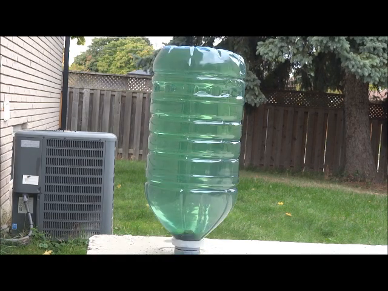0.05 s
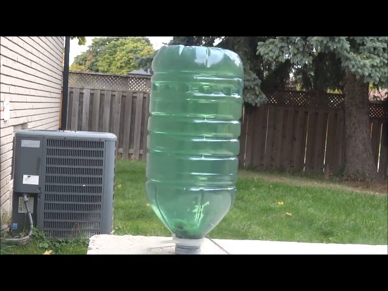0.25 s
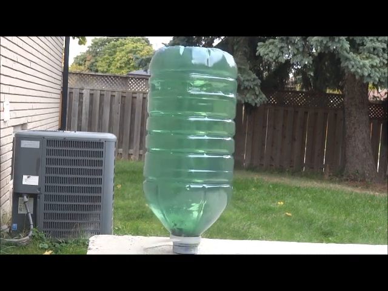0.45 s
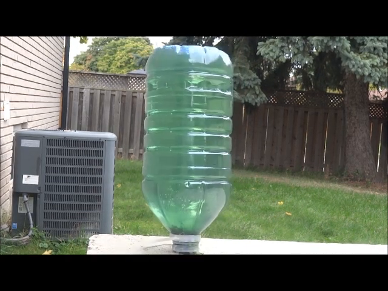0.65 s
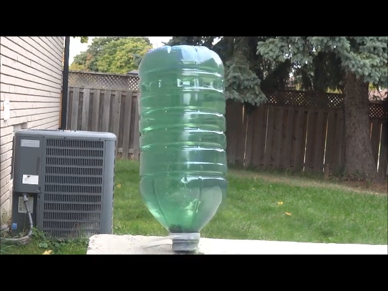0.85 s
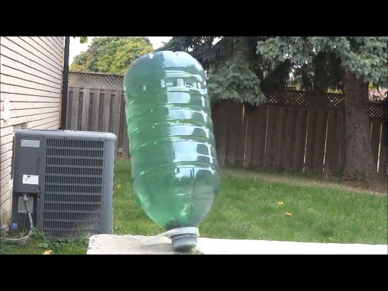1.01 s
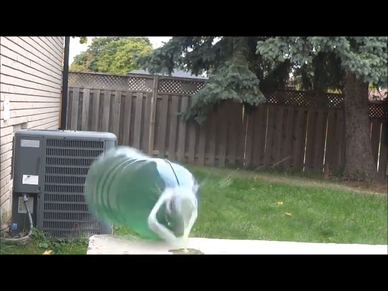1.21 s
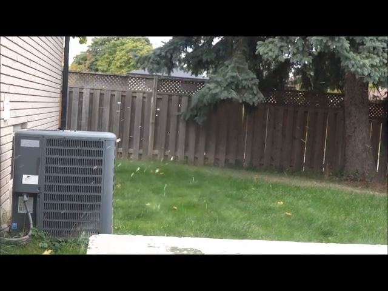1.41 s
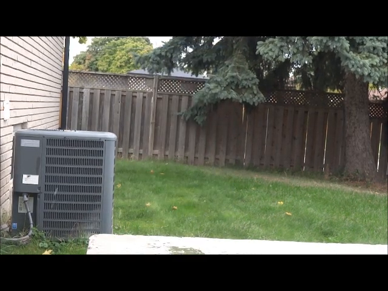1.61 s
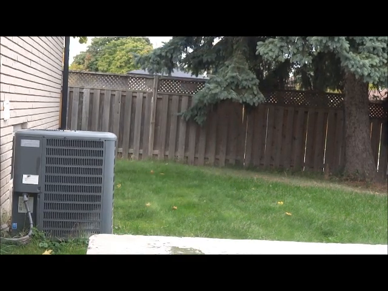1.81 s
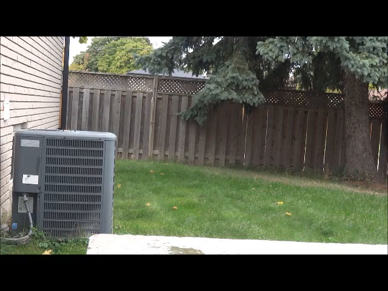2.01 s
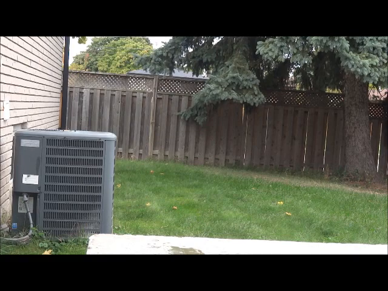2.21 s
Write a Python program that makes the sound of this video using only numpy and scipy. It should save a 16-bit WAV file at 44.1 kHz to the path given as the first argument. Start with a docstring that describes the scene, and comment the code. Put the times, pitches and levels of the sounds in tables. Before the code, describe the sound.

A big plastic bottle topples in a backyard. First a thin steel piece strikes beneath it, booming the board and clinking to rest. The bottle then crackles, thuds hollowly to the ground and bounces, close to the microphone.

```python
"""A distant rush fills a fenced yard, turned down by the recorder after the loud strikes and slowly
coming back. A thin steel piece strikes under a big plastic bottle standing on its cap on a board: the
board booms, and the steel bounces to rest, ringing at each clink. The bottle tips, crackles over the
edge as its wall buckles, thuds to the ground and bounces, its hollow inside ringing. The yard adds a
thin echo, and the close microphone's limiter turns the sound down under the loudest blows."""
import sys
import numpy as np
from scipy import signal
from scipy.fft import rfft, irfft
from scipy.io import wavfile
from scipy.ndimage import uniform_filter1d, minimum_filter1d

SR = 44100
rng = np.random.default_rng(int(sys.argv[2]) if len(sys.argv) > 2 else 0)


def master(y):
    """Save y as 16-bit WAV."""
    cut = np.clip(np.atleast_2d(y).T, -1, 1)
    pcm = np.round(cut * 32767)  # scale
    wavfile.write(sys.argv[1], SR, pcm.astype(np.int16))


N = 103635
TIME = np.arange(N) / SR
FREQS = np.maximum(np.arange(N // 2 + 1) * SR / N, 1)


def amp(db):
    """Turn decibels into a factor to multiply by."""
    return 10 ** (np.asarray(db) / 20)


def curve(points):
    """Join (frequency [Hz], level [dB]) points into a gain for every frequency."""
    hz, db = np.array(points, float).T
    return amp(np.interp(np.log(FREQS), np.log(hz), db))


def noise(gain, flutter=1):
    """Stereo noise of level 1, coloured by gain; the bass is nearly the same in both ears."""
    mid, side = rfft(rng.standard_normal((2, N)) * flutter) * gain
    side *= 0.0023 + 0.27 * FREQS ** 2 / (FREQS ** 2 + 870 ** 2)  # widens around 870 Hz
    stereo = irfft(np.array([mid + side, mid - side]), N)
    return stereo / stereo.std()


def envelope(start, rise, hold, t60):
    """Rise, hold, then fade. The fade time, t60, is the seconds it takes to drop 60 dB."""
    t = TIME - start
    return np.clip(t / rise, 0, 1) * np.exp(-np.log(1000) * np.clip((t - rise - hold) / t60, 0, 10))


def ring(start, hz, t60, rise, hold=0, side=0):
    """One fading tone of a struck object; side makes left and right differ."""
    first = int(start * SR)
    t = TIME[:min(N - first, int((rise + hold + t60 * 2) * SR))]
    level = envelope(0, rise, hold, t60)[:len(t)]
    mid, diff = (np.sin(2 * np.pi * hz * t + phase) for phase in rng.uniform(0, 2 * np.pi, 2))
    out = np.zeros((2, N))
    out[:, first:first + len(t)] = level * np.array([mid + side * diff, mid - side * diff])
    return out


def pan(sound, left_db):
    """Lean a sound to the left, or to the right if left_db is negative."""
    return sound * amp([[left_db / 2], [-left_db / 2]])


def crinkle(steps_per_s=503, depth_db=1.5):
    """The fast, random flutter in loudness of a buckling wall."""
    gain = amp(depth_db * np.interp(TIME * steps_per_s, np.arange(N), rng.standard_normal(N)))
    return gain / np.sqrt(np.mean(gain ** 2))


def crinkle_bands(colour):
    """Crinkling noise split into octaves, as (centre [Hz], sound) pairs."""
    spectrum = rfft(noise(curve(colour), crinkle()))
    octave = np.log2(FREQS / 1000)
    return [(1000 * 2. ** k, irfft(spectrum * np.maximum(1 - abs(octave - k), 0), N))
            for k in range(-5, 5)]


def burst(bands, start, rise, hold, t60, tilt_db=0, treble_damping=0.21):
    """A blow wakes so many tones that they blur into noise; the high ones die sooner."""
    out = np.zeros((2, N))
    for hz, band in bands:
        gain = amp(tilt_db * np.log2(hz / 1000))
        fade_s = t60 * (hz / 1000) ** -treble_damping
        out += gain * band * envelope(start, rise, hold, fade_s)
    return out


# tone colour of the rush (frequency [Hz], level [dB])
RUSH_COLOUR = [(25, -49), (60, -23), (115, -6), (200, -8), (400, -3), (950, 2), (2200, -10), (3800, -22),
               (7000, -26), (11000, -28), (15500, -38)]
# the rush's level as the recorder turns it down and back up (time [s], level [dB])
RUSH_LEVELS = [(0, -33), (.22, -31.5), (.7, -40), (1.2, -40.5), (1.65, -38.5), (2.35, -37.5)]


def distant_rush():
    """A distant rush, turned down by the recorder after the loud strikes and slowly coming back."""
    times, levels_db = np.array(RUSH_LEVELS).T
    return noise(curve(RUSH_COLOUR)) * amp(np.interp(TIME, times, levels_db))


# families of steel tones: five bend the flat face, "edge" bends it edgewise
FAMILIES = ["low", "middle", "bright", "high", "top", "edge"]
# how long each family of steel tones rings, as a factor on its fade time
FADE_FACTOR = dict(low=1, middle=0.6, bright=0.69, high=0.53, top=0.66, edge=0.78)
# the steel's own tones (pitch [Hz], level [dB], fade time before FADE_FACTOR [s], family)
STEEL_TONES = [(771, -3.5, .3, "low"), (1361, 1, .21, "low"), (1835, -4, .6, "low"),
               (3130, 4, .13, "middle"), (4320, -.5, .28, "middle"), (4850, -1.5, .28, "middle"),
               (5636, -3, .14, "bright"), (8790, -4, .13, "bright"), (2212, -7, .2, "high"),
               (7122, -2, .17, "high"), (7162, 1, .14, "high"), (7425, -9, .2, "high"),
               (10285, -2, .16, "top"), (10540, -1.5, .15, "top"), (12190, -5, .11, "top"),
               (14485, -3, .09, "top"), (1719, 0, .6, "edge"), (2885, 0, .33, "edge"),
               (5068, -1, .22, "edge"), (10002, 1, .2, "edge")]
# each time the steel hits (time [s], one level for each of the six families [dB], tick level [dB])
STEEL_HITS = [(0.2343, -26, -27.5, -2, -8, -8, -26, -1), (.2555, -39, -16, -16, -8, -25, -16, -2),
              (.275, -26, -25, -3.5, -13.5, -8, -39, -16), (0.3356, -25, -34, -4, 7, -1, -37, -4),
              (.3542, -18, -5, 5, -7, -3.5, -35, 8), (.3805, -37, -26, 2, 0.5, -6.5, -11, 3),
              (.551, -18.5, -21.5, -11.5, -22, -24.5, -33, -13),
              (.630, -42, -29, -14, -27, -30, -38, -11.5), (.651, -25, -32, -28, -11.5, -20, -22.5, -7.5),
              (.668, -36, -33.5, -15.5, -18.5, -19.5, -43, -24),
              (.690, -38, -27.5, -23, -28, -21, -32.5, -23), (.7408, -66, -36, -24, -27.5, -26, -61, -16.5),
              (0.7744, -62, -39.5, -31, -37, -25.5, -43, -16), (.814, -46, -35.5, -35, -44, -39, -42, -23),
              (0.852, -47, -45, -38, -36, -51, -47, -29), (.897, -50, -44, -35, -29.5, -34.5, -54, -19.5),
              (0.971, -54, -52, -42, -43, -57, -53, -25.5), (.9977, -64, -48, -40, -43, -38, -53, -22)]
# tone colour of the tick at contact (frequency [Hz], level [dB])
TICK_COLOUR = [(300, -18), (1000, 2), (4000, -16.5), (4900, 4), (6300, -15), (10500, 15.5), (13000, 7.5),
               (16000, -18)]
# shimmer of the steel's many crowded high tones (frequency [Hz], level [dB])
SHIMMER_COLOUR = [(500, -62), (4000, -22), (6500, -14.5), (7300, -4), (7900, -14.5), (8750, -4.5),
                  (9400, -21), (10350, 3), (11400, -37), (12150, -8.5), (13100, -52), (14300, -10),
                  (15500, -37.5)]
# treble lost while the bottle weighs on the steel (frequency [Hz], level change [dB])
WEIGHT_DULLING = [(10700, -3.5), (12200, -9), (14500, -9.5)]


def steel_clinks(contact_s=.0004, tick_t60=0.017, chatter_s=0.0055, weighed_until_s=.5):
    """Each hit damps the earlier ringing, ticks, and rings the tone families by where it lands."""
    out = np.zeros((2, N))
    tick, shimmer = noise(curve(TICK_COLOUR)), noise(curve(SHIMMER_COLOUR))
    for i, (start, *family_db, tick_db) in enumerate(STEEL_HITS):
        strength_db = dict(zip(FAMILIES, family_db))
        # the first strike is held against the cap, which lowers its pitch and keeps it buzzing
        pitch, hold = (.974, .015) if i == 0 else (1, 0)
        touch = envelope(start, contact_s, 0, tick_t60)
        second_touch = amp(-6.5) * envelope(start + chatter_s, contact_s, 0, tick_t60)
        clink = amp(tick_db) * tick * (touch + second_touch)
        clink += amp(strength_db["top"] + 2.5) * shimmer * envelope(start, contact_s, hold, t60=0.19)
        for hz, db, t60, family in STEEL_TONES:
            # each hit presses on the tones a little differently
            gain = amp(db + strength_db[family] + 0.5 * rng.standard_normal())
            detune = 1 + 0.002 * rng.standard_normal()
            fade_s = t60 * FADE_FACTOR[family]
            clink += gain * ring(start, hz * pitch * detune, fade_s, contact_s, hold, side=0.082)
        if start < weighed_until_s:
            clink = irfft(rfft(clink) * curve(WEIGHT_DULLING), N)
        damping = amp(-42 * np.clip((TIME - start) / contact_s, 0, 1))
        out = out * damping + clink
    return pan(out, left_db=-0.9)


# tones of the board with the bottle on it (pitch [Hz], level [dB], fade time [s])
BOARD_TONES = [(364, -25, 0.47), (416, -4, 0.39), (547, -34, 0.4), (594, 2, 0.38), (690, -5, 0.58)]
# tone colour of the board's rattle (frequency [Hz], level [dB])
RATTLE_COLOUR = [(40, -41), (100, -27), (150, -17), (240, -8.5), (380, 2), (650, -1), (1000, -6.5),
                 (2200, -11), (4000, -15.5), (10500, -14.5), (15000, -38)]


def board_boom(start=.236, rise=0.026, hold=0.031):
    """The first strike sets the board and the bottle on it booming and rattling."""
    boom = sum(amp(db) * ring(start, hz, t60, rise, hold) for hz, db, t60 in BOARD_TONES)
    rattle = burst(crinkle_bands(RATTLE_COLOUR), start, rise, hold, t60=0.58)
    return amp(-12) * boom + amp(-8.5) * rattle


# tone colour of the yard's echo (frequency [Hz], level [dB])
ECHO_COLOUR = [(100, 6.5), (600, -12.5), (3000, -8), (9000, -15.5), (16000, -24)]


def yard_echo(sound):
    """The house wall and the fence throw back a thin echo."""
    tail = noise(curve(ECHO_COLOUR)) * envelope(start=0.014, rise=0.012, hold=0, t60=0.45)
    tail /= np.sqrt(np.sum(tail ** 2) / 2)
    return amp(-20) * signal.fftconvolve(sound, tail, axes=1)[:, :N]


# snaps, knocks and crunches (time [s], level [dB], centre [Hz], width [octaves], fade time [s])
PLASTIC_SNAPS = [(0.5281, -11, 6000, 0.49, 0.0074), (0.5283, -18, 2290, 0.2, 0.012),
                 (0.6501, -3, 2640, 0.42, 0.015), (0.669, -12, 2900, 0.43, 0.028),
                 (1.231, -41.5, 11100, 0.45, 0.017), (1.305, -19.5, 2170, 0.38, 0.012),
                 (1.309, -24, 1670, .8, 0.025), (1.311, -26, 9000, 0.9, 0.0088),
                 (1.331, -16, 5900, 0.13, 0.016), (1.3354, -19, 2530, 0.48, 0.031),
                 (1.33, -25.5, 10000, 0.68, 0.22), (1.338, -29, 394, 0.45, 0.11),
                 (1.3511, -11, 7400, 0.68, 0.0041), (1.3599, -12.5, 6600, 0.63, 0.007),
                 (1.361, -24.5, 456, 0.98, 0.099), (1.3737, -23, 6300, 0.23, 0.007),
                 (1.718, -4, 1290, 0.42, 0.097), (2.214, -17, 2350, 0.35, 0.0084),
                 (2.246, -20.5, 2220, 0.36, 0.056), (2.336, -20.5, 2440, 0.23, 0.039)]


def plastic_snaps(rise_cycles=1.5, top_hz=12200):
    """Short dry cracks as the cap rocks and the ribbed wall buckles."""
    out = np.zeros((2, N))
    treble_cut = 1 / (1 + (FREQS / top_hz) ** 20)
    for start, db, hz, width, t60 in PLASTIC_SNAPS:
        band = np.exp(-.5 * (np.log2(FREQS / hz) / width) ** 2)
        out += amp(db) * noise(band * treble_cut) * envelope(start, rise_cycles / hz, 0, t60)
    return out


# blows on the bottle (time [s], shell level [dB], rise [s], hold [s], fade time at 1 kHz [s],
# tilt towards the treble [dB per octave], hollow level [dB])
BOTTLE_BLOWS = [(1.296, -30.5, 0.004, 0.023, 0.085, 0.5, -67), (1.328, -29.5, 0.0083, 0.025, 0.43, -2, -44),
                (1.672, -8.5, 0.006, 0.052, 0.39, -0.5, -13), (1.879, -37, 0.0023, 0.0036, 0.22, 4, -31.5),
                (1.948, -31, 0.015, 0.051, 0.26, .5, -36.5), (2.033, -15, 0.0081, 0.023, 0.28, -1, -14),
                (2.202, -29, 0.0092, 0.029, 0.25, -0.5, -34), (2.254, -46, 0.0036, 0.022, 0.25, 0.5, -26.5),
                (2.335, -28.5, 0.00079, 0.0078, .2, -2, -35)]
# tone colour of the plastic shell (frequency [Hz], level [dB])
SHELL_COLOUR = [(50, -49), (150, -14.5), (280, -14.5), (480, 3.5), (750, 1.5), (1400, -0.5), (2600, -3.5),
                (4200, -12), (8000, -18.5), (10800, -13.5), (13000, -23.5), (16000, -32)]
# tones of the hollow inside (pitch [Hz], level [dB], fade time [s])
HOLLOW_TONES = [(442, -3.5, 0.038), (498.4, 3.5, 0.067), (543.4, -1.5, 0.32), (620, 2, 0.062)]


def bottle_thuds():
    """Every blow crumples the thin shell for a moment and rings the hollow inside."""
    out, shell = np.zeros((2, N)), crinkle_bands(SHELL_COLOUR)
    for start, shell_db, rise, hold, t60, tilt_db, hollow_db in BOTTLE_BLOWS:
        out += amp(shell_db) * burst(shell, start, rise, hold, t60, tilt_db)
        for hz, tone_db, tone_t60 in HOLLOW_TONES:
            out += amp(hollow_db + tone_db) * ring(start, hz, tone_t60, rise)
    return pan(out, left_db=0.9)


def scene():
    """Steel, board and bottle with their echo, over the distant rush."""
    direct = steel_clinks() + board_boom() + bottle_thuds() + plastic_snaps()
    return direct + yard_echo(direct) + distant_rush()


def record(dry):
    """A limiter turns down just before loud peaks and recovers steadily; the highest treble is cut."""
    ceiling_db, recovery_db_per_s, lookahead_s, top_hz = -1.05, 190, .0024, 15800
    peak_db = 20 * np.log10(abs(dry).max(axis=0) + 1e-9)
    excess_db = np.maximum(peak_db - ceiling_db, 0)
    recovery_db = recovery_db_per_s * TIME
    gain_db = recovery_db - np.maximum.accumulate(excess_db + recovery_db)
    span = 2 * int(lookahead_s * SR) + 1
    smooth_db = uniform_filter1d(minimum_filter1d(gain_db, span), span)
    treble_cut = signal.ellip(8, .2, 70, top_hz, fs=SR, output="sos")
    return signal.sosfilt(treble_cut, dry * amp(smooth_db))


dry = scene()
out = record(dry)
master(out)
```